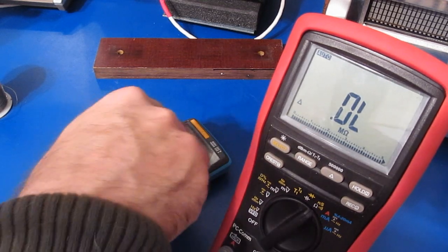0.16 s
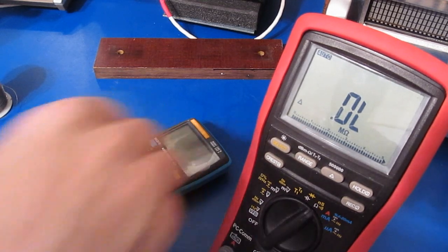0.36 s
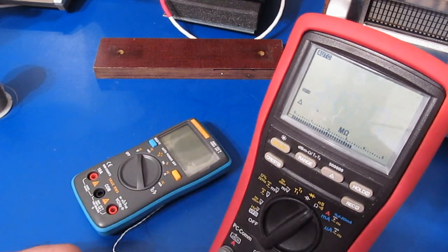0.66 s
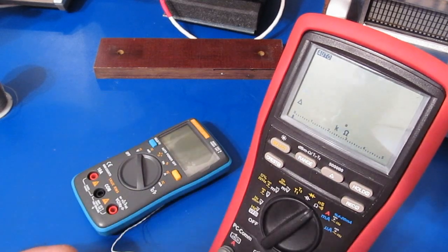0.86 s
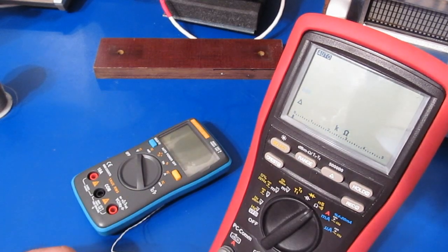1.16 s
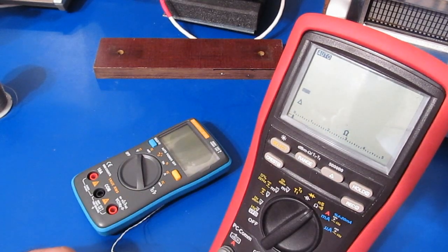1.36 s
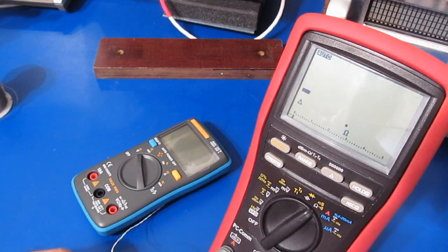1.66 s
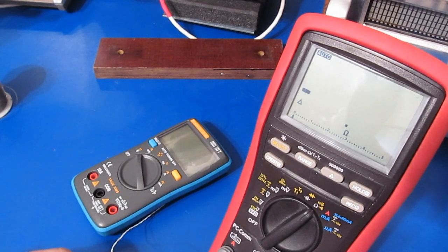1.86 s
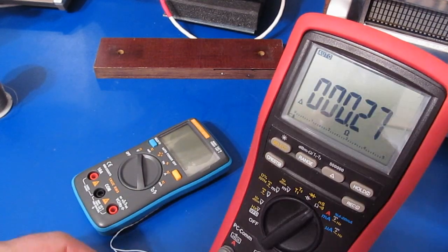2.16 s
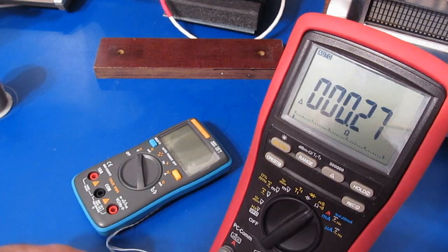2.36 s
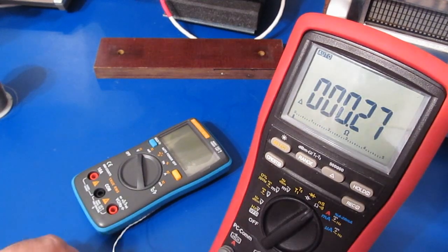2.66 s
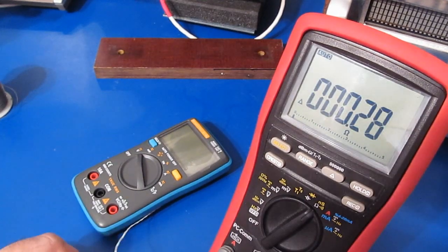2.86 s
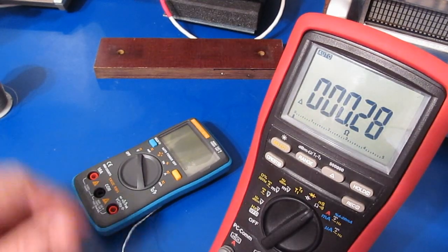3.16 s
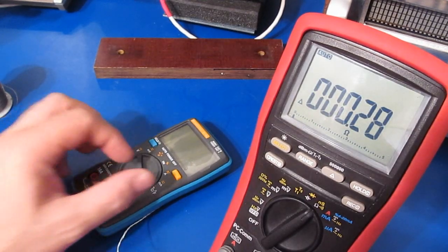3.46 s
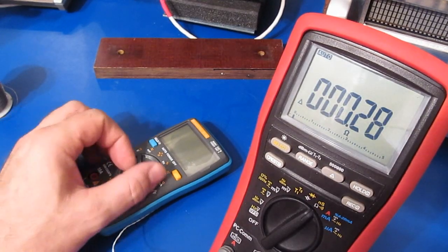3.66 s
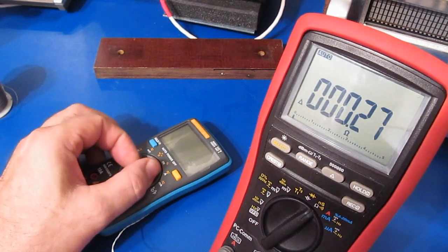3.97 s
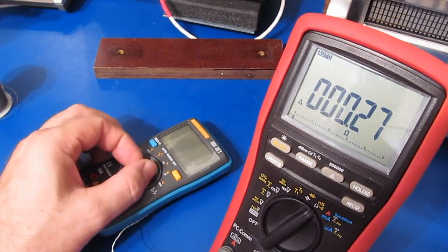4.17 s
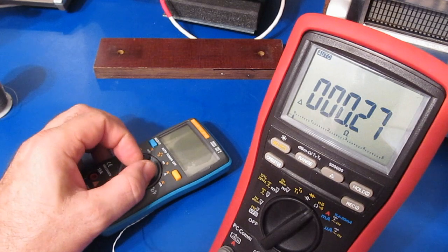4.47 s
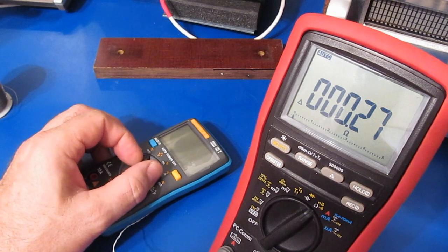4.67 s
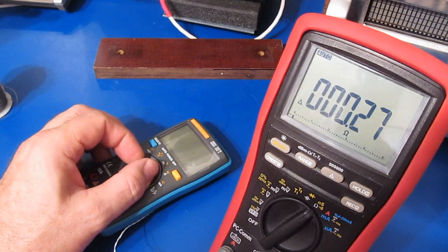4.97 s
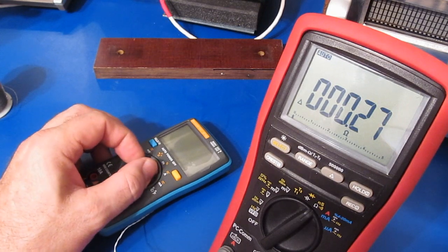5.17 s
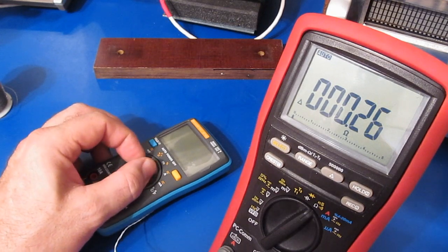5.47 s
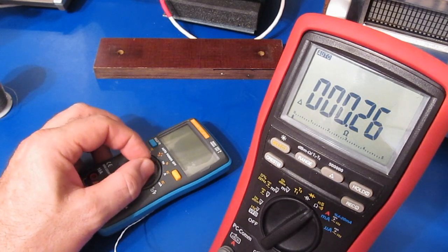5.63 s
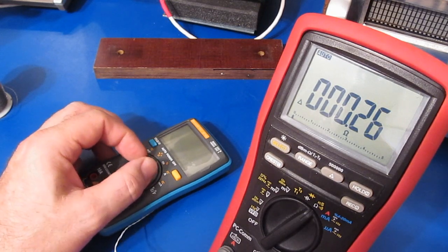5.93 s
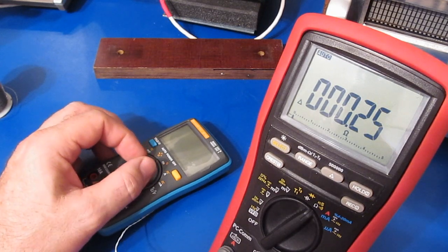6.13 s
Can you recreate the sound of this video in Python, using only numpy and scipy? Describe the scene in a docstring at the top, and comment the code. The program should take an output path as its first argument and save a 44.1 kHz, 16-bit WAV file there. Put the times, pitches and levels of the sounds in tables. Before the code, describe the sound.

Close, crisp detent snaps from a handheld meter's knob, spaced apart by quiet handling, ticks and cloth rubs, above low fan noise and mains hum.

```python
"""A handheld meter on a workshop bench: a hand turns its rotary switch three times.
Each turn, the detent spring rubs up its ramp (noise), snaps into the next notch (coloured noise bursts)
and rings the plastic case (decaying modes).
In between, fingers and a sleeve brush and tap the meter and the bench (noise swells, clicks, bench modes).
Equipment hums and a fan runs (sines, coloured noise); a small room echoes the contact sounds."""
import sys
import numpy as np
from scipy import signal
from scipy.fft import rfft, irfft
from scipy.io import wavfile
from scipy.ndimage import map_coordinates

SR = 44100
rng = np.random.default_rng(int(sys.argv[2]) if len(sys.argv) > 2 else 0)


def transcribe(u):
    """Save the signal u as a 16-bit wav file named by the first command-line argument.

    u: samples, shape (n,) or (channels, n), limited to [-1, 1]; the rate is SR.
    q: integer samples, one column per channel.
    """
    v = np.clip(np.atleast_2d(u).T, -1, 1)
    q = np.round(v * 32767).astype(np.int16)
    wavfile.write(sys.argv[1], SR, q)


N = 277830
TIME = np.arange(N) / SR


def from_db(db):
    """Decibels to amplitude gain."""
    return 10 ** (np.asarray(db) / 20)


def rms_one(x):
    """Scale to unit power."""
    return x / np.sqrt(np.mean(x ** 2) + 1e-20)


def at_hz(points, hz):
    """Interpolate a table along a log-frequency axis."""
    table_hz, value = np.transpose(points)
    return np.interp(np.log(hz), np.log(table_hz), value)


def bins(size):
    """Frequencies in Hz of a spectrum of this many samples, at least 1 Hz."""
    return np.maximum(np.fft.rfftfreq(size, 1 / SR), 1)


def add(out, s, sound):
    """Mix a sound in at a time in seconds."""
    start = max(round(s * SR), 0)
    out[..., start:start + sound.shape[-1]] += sound[..., :N - start]


def place(x, pan_db, lag_ms):
    """Stereo from level and delay: positive pan favours the left, the right channel lags."""
    late = map_coordinates(x, [np.arange(len(x)) - lag_ms * SR / 1000], order=3)
    return np.array([x * from_db(pan_db / 2), late * from_db(-pan_db / 2)])


def burst(colour_db, t60_s, size=8192):
    """A crowd of short-lived modes set off at once: a coloured crack that starts at unit power."""
    t = TIME[:size]
    fade = from_db(-60 * t / t60_s)
    crack = rng.standard_normal(size) * fade
    # alternate: impose the spectrum, then silence all beyond t60
    for _ in range(3):
        phase = np.angle(rfft(crack))
        crack = irfft(from_db(colour_db) * np.exp(1j * phase), size) * (t < t60_s)
    return rms_one(crack) * np.sqrt(np.mean(fade ** 2))


def ring(modes, uneven_db, size=16384):
    """A struck body: decaying sine modes, excited a little differently at every blow."""
    hz, db, t60_s = np.transpose(modes)[:, :, None]
    t = TIME[:size]
    signs = (-1) ** np.arange(len(modes))[:, None]
    level_db = db + uneven_db * rng.standard_normal(db.shape) - 60 * t / t60_s
    return np.sum(signs * from_db(level_db) * np.sin(2 * np.pi * hz * t), axis=0)


# Diffuse sound at the two microphones. Each row: frequency in Hz, left-right likeness (1 = identical).
LIKENESS = [(25, 0.098), (60, 0.49), (200, 0.86), (640, 0.56), (1400, 0.2), (3100, 0), (15000, 0)]


def diffuse(size):
    """Spectra of white noise from all sides: the channels' likeness varies with frequency."""
    mid, side = rfft(rng.standard_normal((2, size)))
    alike = np.clip(at_hz(LIKENESS, bins(size)), -1, 1)
    return np.sqrt(1 + alike) * mid + np.sqrt(1 - alike) * side * np.array([[1], [-1]])


# Fan air spectrum. Each row: frequency in Hz, relative density in dB per Hz.
AIR_SPECTRUM = [(12, -48), (24, 9.5), (31, 5.5), (39, -3.5), (62, -8.5), (82, -3), (130, -2), (230, -4.5),
                (330, -10.5), (700, -13.5), (1250, -14.5), (1800, -17.5), (7000, -30), (16000, -42)]
AIR_RMS_DB = -50.5
# Narrow bands of stronger hiss. Each row: centre in Hz, width in Hz, boost over the air in dB.
HISS_BANDS = [(13940, 350, 7.5)]
# Mains hum and fan tones. Each row: frequency in Hz, level in dB rms.
HUM_TONES = [(60, -61), (119.7, -60.5), (239.3, -63), (360, -69), (420, -63), (480, -68.5), (839.5, -72),
             (1086.4, -62), (1200.5, -70.5), (1241.8, -61), (1706, -75.5)]


def equipment(waver_rad=0.23, apart_rad=0.83):
    """Fan air and steady hum; the tones' phases waver and differ between the channels."""
    f = bins(N)
    colour_db = at_hz(AIR_SPECTRUM, f)
    for hz, width_hz, boost_db in HISS_BANDS:
        colour_db = colour_db + boost_db * np.exp(-((f - hz) / width_hz) ** 2)
    out = from_db(AIR_RMS_DB) * rms_one(irfft(diffuse(N) * from_db(colour_db), N))
    knots_s = np.linspace(0, TIME[-1], 40)
    ears_rad = np.array([[.5], [-.5]]) * apart_rad
    for hz, db in HUM_TONES:
        wander_rad = waver_rad * np.interp(TIME, knots_s, rng.standard_normal(len(knots_s)))
        phase = 2 * np.pi * (hz * TIME + rng.random()) + wander_rad + ears_rad
        out = out + np.sqrt(2) * from_db(db) * np.sin(phase)
    return out


# Fingers land on the case and slide a little.
# Each row: landing in seconds, thud in dB, contact cut-off in Hz, slide in dB.
FINGERS = [(.021, -31.5, 700, -56), (.121, -35, 800, -48), (.301, -32, 800, -59), (0.3577, -19.5, 780, -44),
           (3.616, -31.5, 1400, -50.5), (3.647, -35.5, 2000, -46.5), (3.844, -34, 700, -49),
           (3.943, -29, 705, -64), (3.957, -29, 700, -66.5), (4.024, -28, 700, -61)]
# Switch turns, one notch each. Each row: snap in seconds, crack in dB, ring in Hz, ring boost in dB,
# treble edge in Hz, rebound in seconds after the snap, rebound in dB below the crack,
# case jolt in dB, jolt cut-off in Hz, ramp in seconds before the snap, ramp in dB.
TURNS = [(0.2250, -13, 3080, 7, 9600, .0044, 8, -22.5, 960, .0105, -29.5),
         (4.1113, -11.5, 2657, 2, 14000, .0016, 6.5, -20, 7000, .031, -33),
         (5.6453, -17, 4930, 7, 10700, .0055, 13, -21, 1760, .055, -40.5)]
JOLT_LEAD_SHARE = 0.03464  # jolt precedes the crack by this share of the ramp time
NUDGE_CUT_OFF_SHARE = 0.6  # the ramp nudge is a softer contact than the jolt


def case_blows():
    """Finger thuds, ramp nudges and snap jolts, as (s, dB, contact cut-off Hz)."""
    blows = [(s, db, contact_hz) for s, db, contact_hz, _ in FINGERS]
    for s, *_, case_db, case_hz, ramp_s, ramp_db in TURNS:
        blows.append((s - ramp_s, ramp_db, NUDGE_CUT_OFF_SHARE * case_hz))
        blows.append((s - JOLT_LEAD_SHARE * ramp_s, case_db, case_hz))
    return blows


# Modes of the plastic case. Each row: frequency in Hz, relative level in dB, t60 in seconds.
CASE_MODES = [(609, -10, .028), (730, -6, 0.04), (920, -16, 0.038), (1130, -7.5, 0.0057), (1366, -3, 0.049),
              (1687, -9, 0.048), (2730, 5, 0.009), (3200, -8.5, 0.015), (6040, 2, 0.015), (9500, 1, 0.0114)]


def case():
    """Blows ring the case; a soft contact low-passes the ring, leaving mostly low modes."""
    out = np.zeros(N)
    for s, db, contact_hz in case_blows():
        contact = signal.butter(4, contact_hz, fs=SR, output="sos")
        add(out, s, from_db(db) * signal.sosfilt(contact, ring(CASE_MODES, uneven_db=1)))
    return place(out, pan_db=-2.0, lag_ms=0.044)


def friction(strokes, spectrum, grain_db, lead, roundness, size=16384):
    """Each stroke is a swell of tiny uneven slips that builds up and then trails off."""
    out, hz = np.zeros(N), bins(size)
    for s, db, swell_s, tilt_db_per_octave in strokes:
        slips = rng.standard_normal(size) * from_db(grain_db * rng.standard_normal(size))
        colour_db = at_hz(spectrum, hz) + tilt_db_per_octave * np.log2(hz)
        rub = rms_one(irfft(rfft(slips) * from_db(colour_db)))
        start_s = max(s - size / SR / 2, 0)
        progress = (start_s + TIME[:size] - s) / swell_s
        rise = (progress / lead) ** 2 / 2
        fall = np.abs(progress) ** roundness / roundness
        swell = np.exp(-np.where(progress < 0, rise, fall))
        add(out, start_s, from_db(db) * rub * swell)
    return place(out, pan_db=0.0, lag_ms=0.028)


NEUTRAL_SWELL_S, QUICK_TILT_DB_PER_OCTAVE = 0.048, 0.95  # tilt gained per halving of the swell time


def stroke(s, db, swell_s):
    """A stroke with its spectral tilt: the quicker, the brighter."""
    return s, db, swell_s, QUICK_TILT_DB_PER_OCTAVE * np.log2(NEUTRAL_SWELL_S / swell_s)


# Plastic rub spectrum. Each row: frequency in Hz, relative density in dB per Hz.
RUB_SPECTRUM = [(150, -5.5), (450, -2), (750, 3.5), (1500, -2), (2600, -4), (4500, -11), (6200, -12.5),
                (7500, -13), (10000, -19), (15000, -33)]
# Short rubs soon after a turn, as meter or knob settles.
# Each row: peak in seconds, level in dB, swell time in seconds.
AFTER_TURN_RUBS = [(.268, -39.5, 0.035), (4.268, -46.5, 0.017)]
RAMP_SWELL_S, RAMP_TILT_DB_PER_OCTAVE = 0.0086, 0.75
SLIDE_DELAY_S, SLIDE_SWELL_S, SLIDE_TILT_DB_PER_OCTAVE = .005, 0.021, 0.6


def rubs():
    """Friction on plastic: the spring on its ramp, landing fingers, meter or knob settling after a turn."""
    ramps = [(s - ramp_s, ramp_db, RAMP_SWELL_S, RAMP_TILT_DB_PER_OCTAVE)
             for s, *_, ramp_s, ramp_db in TURNS]
    slides = [(s + SLIDE_DELAY_S, slide_db, SLIDE_SWELL_S, SLIDE_TILT_DB_PER_OCTAVE)
              for s, *_, slide_db in FINGERS]
    strokes = ramps + slides + [stroke(*row) for row in AFTER_TURN_RUBS]
    return friction(strokes, RUB_SPECTRUM, grain_db=4.0, lead=0.56, roundness=0.99)


# Things knocked on the bench. Each row: start in seconds, tick in dB, centre in Hz, width in octaves,
# t60 in seconds, after-ring in Hz, after-ring in dB, bench bump in dB.
KNOCKS = [(.361, -37.5, 3030, .2, .037, 707, -46, -52), (.748, -35.5, 1080, 0.35, .12, 2300, -47, -40),
          (.763, -41, 2320, .4, 0.15, 1100, -41, -52), (2.169, -33, 3700, .9, 0.016, 2500, -51, -60),
          (2.354, -29, 3630, 1.6, 0.014, 3000, -48, -59), (2.421, -16, 3470, 0.33, 0.0037, 400, -48, -25.5),
          (2.4305, -14.5, 4330, 1.3, 0.0088, 2510, -36, -41),
          (2.4799, -31.5, 2830, 1.9, .011, 2400, -48, -38), (2.551, -37, 5070, 1.6, .024, 5200, -54, -55),
          (2.634, -40, 5340, .3, .023, 1700, -50, -55), (2.811, -28.5, 2000, 0.91, 0.036, 735, -36, -36.5),
          (2.921, -37.5, 1790, 0.85, 0.05, 720, -41, -41.5), (3.191, -36, 1510, .54, 0.014, 5200, -60, -46),
          (3.311, -42, 6700, 0.59, 0.056, 5200, -56, -59), (3.811, -37.5, 2630, 0.52, .022, 3000, -54, -59)]
AFTER_RING_OCTAVES, AFTER_RING_T60_S = 0.39, 0.09
# Something rocks to rest: fading ticks of scattered pitch, RATTLE_LOSS_DB softer each.
RATTLE_START_S, RATTLE_GAP_S, RATTLE_DB, RATTLE_LOSS_DB = 2.574, .0205, -33, 5
RATTLE_HZ, RATTLE_SCATTER_OCTAVES, RATTLE_WIDTH_OCTAVES, RATTLE_T60_S = 3200, 0.48, 2.3, 0.023


def taps(count=5):
    """Knocks, their narrow-band after-rings and the rattle, as (s, dB, Hz, octaves, t60 s)."""
    ticks = [tuple(row[:5]) for row in KNOCKS]
    rings = [(s, db, hz, AFTER_RING_OCTAVES, AFTER_RING_T60_S) for s, *_, hz, db, _ in KNOCKS]
    pitches_hz = RATTLE_HZ * 2 ** (RATTLE_SCATTER_OCTAVES * rng.standard_normal(count))
    rattle = []
    for k, hz in enumerate(pitches_hz):
        s, db = RATTLE_START_S + k * RATTLE_GAP_S, RATTLE_DB - k * RATTLE_LOSS_DB
        rattle.append((s, db, hz, RATTLE_WIDTH_OCTAVES, RATTLE_T60_S))
    return ticks + rings + rattle


# The hand's weight thumps the bench top. Each row: start in seconds, level in dB.
THUMPS = [(.224, -33), (.268, -40.5), (.864, -37.5), (3.868, -33)]
# Modes of the bench top. Each row: frequency in Hz, relative level in dB, t60 in seconds.
BENCH_MODES = [(85, -9, 0.067), (127, -2, 0.066), (182, -7.5, 0.16), (242, -2.5, 0.067), (326, -1, 0.026),
               (453, -3.5, 0.026)]


def bench(skirt_db=30, mat_hz=7000, mat_db=-9.5):
    """Taps click in a band of their own; knocks and thumps also shake the bench top."""
    out, hz = np.zeros(N), bins(size=8192)
    mat = mat_db / (1 + (mat_hz / hz) ** 10)  # the bench mat softens the treble
    for s, db, centre_hz, octaves, t60_s in taps():
        away = (np.log2(hz / centre_hz) / octaves) ** 2
        add(out, s, from_db(db) * burst(mat - skirt_db * away / (away + 6), t60_s))
    for s, *_, db in KNOCKS + THUMPS:
        add(out, s, from_db(db) * ring(BENCH_MODES, uneven_db=1.0))
    soft = signal.butter(2, 9500, fs=SR)  # no contact is instantaneous
    return place(signal.lfilter(*soft, out), pan_db=1.5, lag_ms=0.06)


# Snap spectrum. Each row: frequency in Hz, relative density in dB per Hz.
CRACK_SPECTRUM = [(200, -31.5), (500, -20), (800, -4), (2000, -5), (2700, -3), (4000, -5.5), (5600, -2),
                  (7600, -5.5), (8700, 0.5), (10000, -3), (11000, -6.5), (12600, -9.5), (13500, -14),
                  (16000, -5.5)]
# A hard snap is a short one: t60 at the reference level, dB of softening that doubles it.
SNAP_T60_S, SNAP_REFERENCE_DB, SNAP_DOUBLING_DB = .016, -10.5, 9.5


def detents(ring_octaves=0.28, edge_slope=12):
    """The spring drops into its notch and rebounds once; each notch favours a ring of its own."""
    out, hz = np.zeros((2, N)), bins(size=8192)
    for s, db, ring_hz, ring_db, edge_hz, rebound_s, rebound_db, *_ in TURNS:
        octaves_away = np.log2(hz / ring_hz)
        ring_boost = ring_db * np.exp(-.5 * (octaves_away / ring_octaves) ** 2)
        treble_loss = 10 * np.log10(1 + (hz / edge_hz) ** edge_slope)
        colour_db = at_hz(CRACK_SPECTRUM, hz) + ring_boost - treble_loss
        t60_s = SNAP_T60_S * 2 ** ((SNAP_REFERENCE_DB - db) / SNAP_DOUBLING_DB)
        for when_s, level_db in (s, db), (s + rebound_s, db - rebound_db):
            snap = from_db(level_db) * burst(colour_db, t60_s)
            add(out, when_s, place(snap, pan_db=2.5, lag_ms=.022))
    return out


# Skin and sleeve brush spectrum. Each row: frequency in Hz, relative density in dB per Hz.
BRUSH_SPECTRUM = [(150, 3.5), (700, 2), (1500, -2.5), (3000, -4.5), (5500, -10), (10000, -15.5),
                  (15000, -33)]
# Skin and sleeve sweep by. Each row: peak in seconds, level in dB, swell time in seconds.
SWEEPS = [(0.491, -57.5, .018), (0.669, -53, 0.063), (0.801, -47.5, 0.085), (2.101, -47.5, 0.018),
          (2.2, -54.5, 0.067), (2.613, -46.5, 0.046), (3.171, -52, 0.2), (3.80, -51, .045)]
# Quick wiping to and fro; each gap is WIPE_SLOWING times the last.
WIPE_START_S, WIPE_GAP_S, WIPE_SLOWING, WIPE_DB, WIPE_SWELL_S = 1.24, .046, 1.22, -51, 0.018


def brushes(count=4):
    """Friction of skin and sleeve: single sweeps, and a run of wipes with growing gaps."""
    gaps_s = WIPE_GAP_S * WIPE_SLOWING ** np.arange(count - 1)
    peaks_s = WIPE_START_S + np.cumsum([0, *gaps_s])
    wipes = [(s, WIPE_DB, WIPE_SWELL_S) for s in peaks_s]
    strokes = [stroke(*row) for row in SWEEPS + wipes]
    return friction(strokes, BRUSH_SPECTRUM, grain_db=7.0, lead=0.91, roundness=1.23)


# Room decay. Each row: frequency in Hz, t60 in seconds.
ROOM_T60 = [(150, 0.26), (1000, 0.21), (3000, 0.25), (6000, 0.2), (10000, 0.19), (15000, 0.069)]


def workshop(dry, near_db=-8, near_t60_s=0.054, clutter_hz=1500, far_db=-12, size=22050):
    """Quick scatter off the cluttered bench, then a room tail with its own t60 in each octave."""
    t, hz, noise = TIME[:size], bins(size), diffuse(size)
    octave = np.round(np.log2(hz))
    tail = np.zeros((2, size))
    for k in np.unique(octave):
        band = irfft(noise * (octave == k), size)
        tail += band * from_db(-60 * t / at_hz(ROOM_T60, 2 ** k))
    tail *= 1 - np.exp(-(t / 0.0048) ** 2)  # gradual onset
    scattered = hz / np.hypot(hz, clutter_hz)  # small things scatter only short waves
    near = irfft(diffuse(size) * scattered, size) * from_db(-60 * t / near_t60_s) * (t > .0008)
    echoes = (from_db(near_db) * rms_one(near) + from_db(far_db) * rms_one(tail)) / np.sqrt(size)
    return dry + signal.fftconvolve(dry.mean(axis=0)[None], echoes, axes=1)[:, :N]


def scene():
    """The meter and the hand in the room, over the hum."""
    switch = case() + rubs() + detents()
    hand = bench() + brushes()
    return equipment() + workshop(switch + hand)


def record(dry):
    """A steep elliptic low-pass cuts the top."""
    steep = signal.ellip(10, .1, 80, 15900, fs=SR, output="sos")
    return signal.sosfilt(steep, dry)


dry = scene()
out = record(dry)
transcribe(out)
```